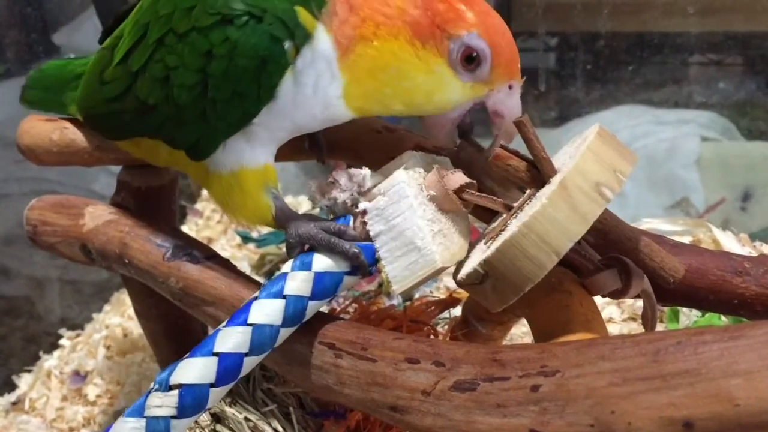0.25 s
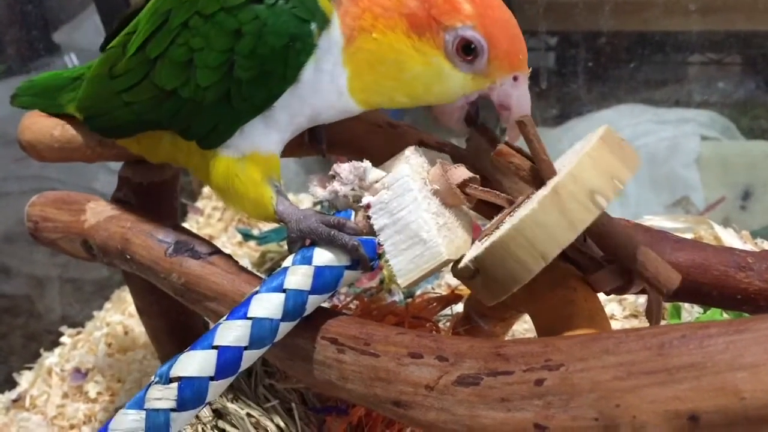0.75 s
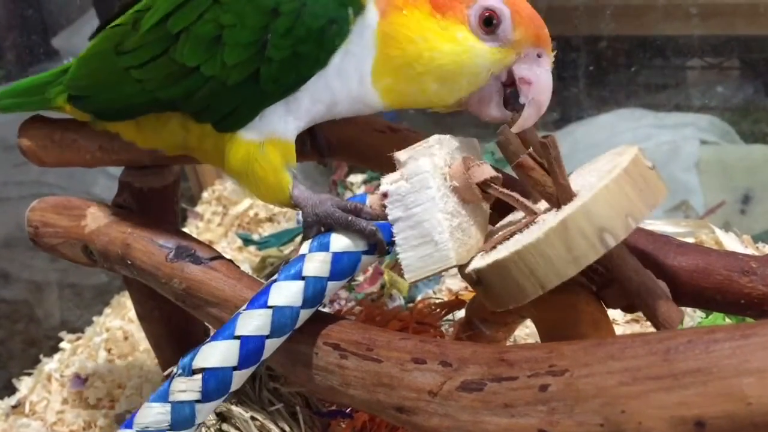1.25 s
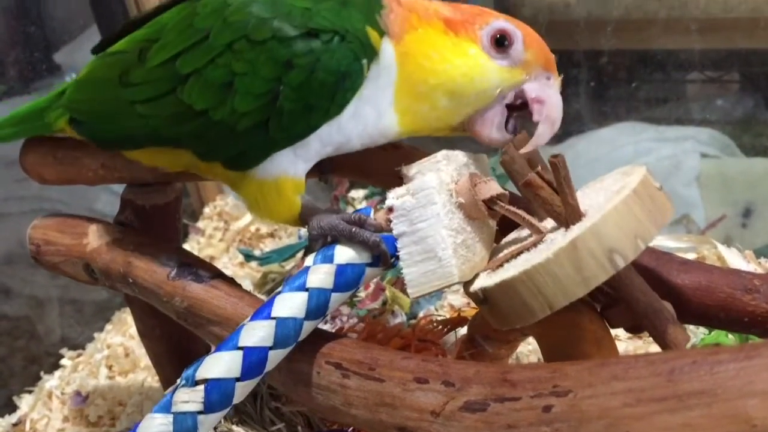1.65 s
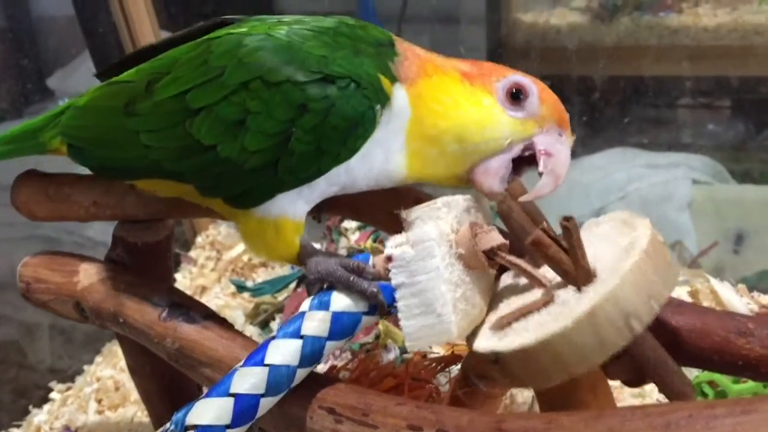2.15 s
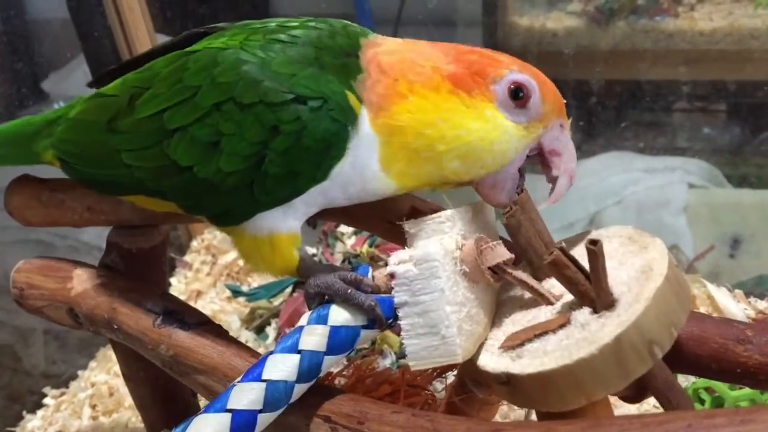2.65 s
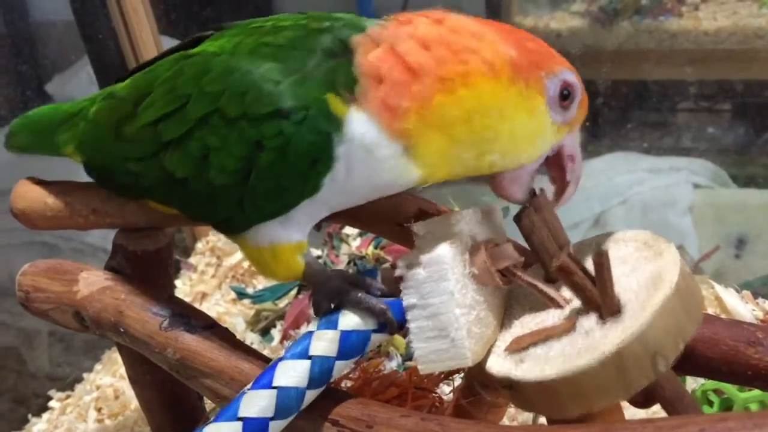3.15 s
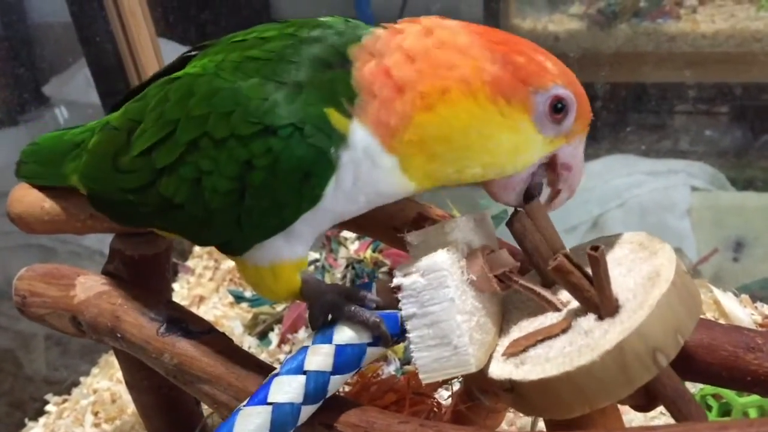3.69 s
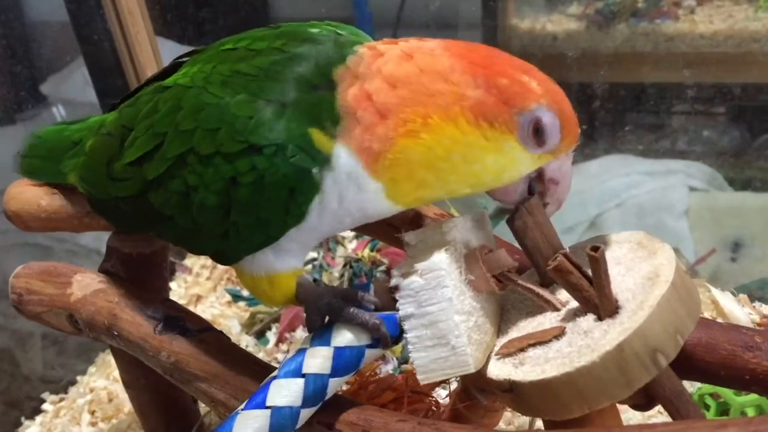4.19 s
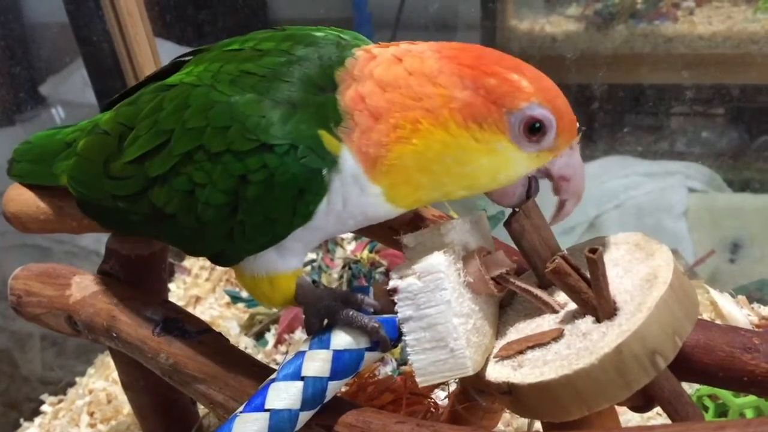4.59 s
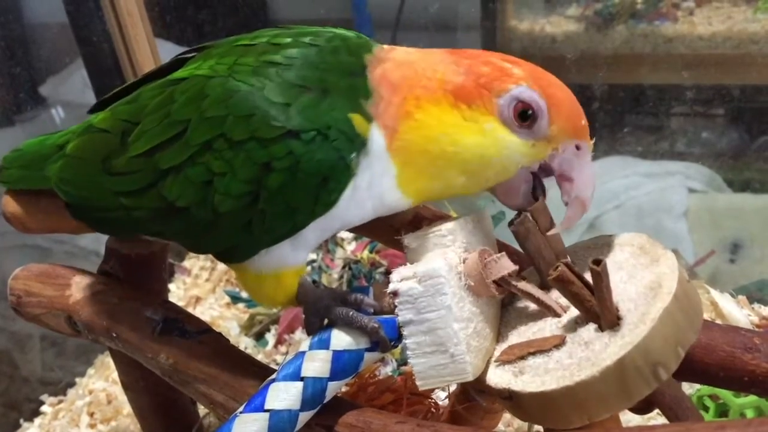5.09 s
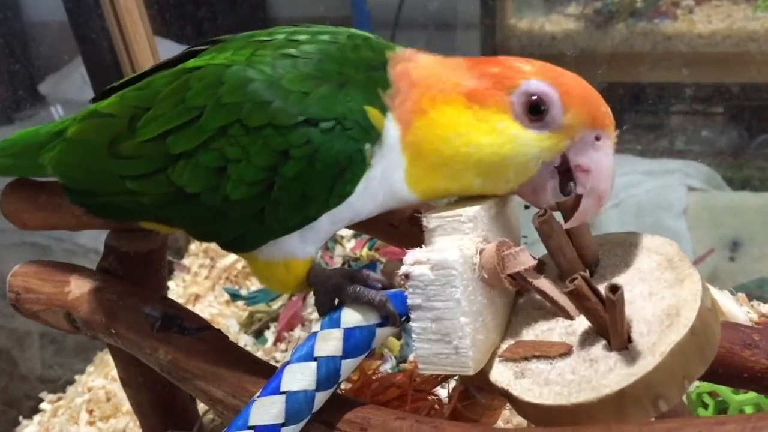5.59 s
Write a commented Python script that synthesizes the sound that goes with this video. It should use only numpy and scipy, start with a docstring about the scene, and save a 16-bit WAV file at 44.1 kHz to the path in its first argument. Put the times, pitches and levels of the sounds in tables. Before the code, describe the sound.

Dry, brittle gnawing recorded close indoors with a short room tail. A beak scrapes and nips woody sticks; fibres tick and snap, loose bits rustle, and each tug gives the perch a deep short wobble and dull thud. Activity is light at first, thins near two seconds, builds to hard cracks around three to four and a quarter, nearly pauses, then resumes with lighter bites. Faint air hiss and low hum stay behind.

```python
"""Parrot gnawing a wooden toy

A parrot gnaws bark sticks close by in a small quiet room. Fibres snap in flurries, each a burst of
tiny breaks ringing the wood; the beak rasps by stick and slip, and soft hollow tones sound along.
Each tug jolts the perch into a low wobble, thuds rattle its frame and loose fibres rustle.
Shaped noise and a low sine make the faint hiss and hum behind."""
import sys
import numpy as np
from scipy import signal
from scipy.fft import rfft, irfft
from scipy.io import wavfile
from scipy.ndimage import uniform_filter1d

SR = 44100
rng = np.random.default_rng(int(sys.argv[2]) if len(sys.argv) > 2 else 0)


def inscribe(sig):
    """Save sig as 16-bit PCM at rate SR to the path in sys.argv[1].

    A 1-D sig is mono; a 2-D sig holds one channel per row.
    Samples are clipped to [-1, 1] before scaling.
    """
    pcm = np.round(np.clip(np.atleast_2d(sig).T, -1, 1) * 32767)
    wavfile.write(sys.argv[1], SR, pcm.astype(np.int16))


N = 257103
TIME = np.arange(N) / SR
DRAW = SR // 6   # samples given to one contact

# How hard the bird works, steering the trembling perch: (time [s], effort level [dB])
EFFORT = [(0.0, -76), (0.57, -68.5), (0.78, -71), (1.39, -65), (2.0, -72), (2.18, -63), (2.35, -56),
          (2.78, -64), (3.41, -51.5), (3.59, -65), (3.85, -59.5), (4.14, -59), (4.38, -64), (4.74, -76),
          (5.03, -68), (5.23, -56.5), (5.52, -57), (5.83, -61.5)]
# Strokes of the beak over bark, knock and edge set against the rasp:
# (time [s], length [s], rasp level [dB], knock [dB], edge [dB], stick pitch [Hz])
BEAK_STROKES = [(0.046, 0.028, -64, 3, -14, 1718), (0.099, 0.033, -79.5, 10.5, 5.5, 1144),
                (0.161, 0.017, -60.5, -14.5, -11.5, 2579), (0.199, 0.047, -69, -8.5, -4, 2993),
                (0.268, 0.027, -83, 8.5, -9, 825), (0.32, 0.055, -78.5, 2, -19, 1765),
                (0.605, 0.035, -84, 7.5, -7, 1736), (0.641, 0.048, -66, 2, -10.5, 1427),
                (0.694, 0.028, -70.5, -2, -10.5, 1734), (0.748, 0.04, -60.5, 0, -10.5, 1402),
                (0.857, 0.044, -75.5, 0.5, -5.5, 3320), (0.941, 0.02, -72, 7, -7.5, 1669),
                (0.998, 0.041, -64, -1, -13, 1817), (1.045, 0.052, -65.5, -5, -10, 2015),
                (1.119, 0.036, -69.5, -12, -1, 3350), (1.159, 0.05, -67.5, -11, 2, 1048),
                (1.22, 0.039, -68, 2, -4.5, 767), (1.254, 0.043, -59.5, 2, -9.5, 2940),
                (1.388, 0.015, -71, -7, -0.5, 1838), (1.422, 0.016, -84.5, 13.5, -4.5, 1105),
                (1.484, 0.038, -72.5, 0, -5, 1166), (1.521, 0.035, -70.5, 0, -1, 857),
                (1.563, 0.042, -72, -1.5, -13, 1785), (1.636, 0.013, -75.5, 2.5, -11, 2240),
                (1.891, 0.049, -66, -3, -14.5, 1727), (2.057, 0.026, -76, 3.5, -8, 1170),
                (2.264, 0.02, -73.5, 16.5, 0.5, 951), (2.29, 0.042, -66, 9, -1.5, 1145),
                (2.356, 0.024, -77, 7, 0.5, 1073), (2.391, 0.056, -71.5, 2.5, -10, 1110),
                (2.474, 0.029, -64.5, -5, -5, 3050), (2.526, 0.024, -69, 2, -11, 1189),
                (2.622, 0.09, -73.5, -0.5, -4, 3068), (2.765, 0.034, -65, 2.5, -6, 2050),
                (2.853, 0.022, -62, 3, -16, 1510), (2.952, 0.06, -63, -6, -11.5, 1682),
                (3.071, 0.049, -78.5, 11.5, -0.5, 1675), (3.218, 0.042, -65, -3.5, -3, 2301),
                (3.263, 0.055, -69.5, 6.5, -1, 1079), (3.387, 0.027, -63.5, 9.5, -17, 1310),
                (3.443, 0.0325, -63, 5, -7, 1086), (3.485, 0.03, -58, 0.5, -15.5, 1520),
                (3.533, 0.014, -65, 1, -14.5, 1750), (3.676, 0.017, -74.5, 10.5, -8.5, 1080),
                (3.748, 0.031, -67, 0.5, -5.5, 1160), (3.84, 0.026, -68.5, -9, -24.5, 2120),
                (4.577, 0.016, -76.5, 5.5, -11, 1722), (4.712, 0.053, -69.5, 4, -6, 1702),
                (5.005, 0.024, -74, 6.5, -9, 1105), (5.059, 0.04, -80, 8.5, -2.5, 986),
                (5.135, 0.019, -81.5, 16, -11, 1144), (5.198, 0.024, -72.5, 6, -20, 2326),
                (5.302, 0.07, -71.5, -0.5, -7, 1767), (5.549, 0.012, -66.5, -2, -16.5, 1644),
                (5.591, 0.021, -70, 11, -9.5, 1501), (5.656, 0.059, -66.5, -6, -3.5, 2996),
                (5.775, 0.045, -72.5, -6, -8, 2300)]
# Clear snaps of fibres, knock, body and edge set against the snap:
# (time [s], snap level [dB], knock [dB], body [dB], edge [dB], stick pitch [Hz])
FIBRE_SNAPS = [(0.0468, -66, 13.5, 16, -3, 1757), (0.1595, -61, -18, 2, -9, 2600),
               (0.2175, -62.5, -14, 2.5, -12, 3120), (0.239, -64.5, -14.5, 8.5, 4, 2610),
               (0.645, -57.5, -24, 0.5, -10.5, 1715), (0.669, -64.5, 7.5, 6, 6, 1418),
               (0.756, -48.5, -9.5, 1, -13.5, 1270), (0.7704, -45, -12, -19.5, -5.5, 1087),
               (0.946, -59.5, 4.5, -2.5, -6, 1110), (1.0038, -61, 4.5, -12.5, -4.5, 1180),
               (1.1517, -30.5, -18, -11.5, -10, 2260), (1.1782, -61, -17, 4, 8, 2580),
               (1.202, -64, 13.5, 2, -10, 1100), (1.2713, -39.5, -24, -0.5, -5, 3020),
               (1.2876, -62.5, 5.5, 12.5, 1.5, 2902), (1.4916, -64.5, 6.5, 4.5, 6, 1178),
               (1.5687, -58, -15, -8.5, -8, 2250), (1.5854, -54, -16.5, -8, -10.5, 1772),
               (2.163, -68, -10, -10, -10, 2296), (2.2717, -71, 19.5, -4.5, -10, 921),
               (2.3028, -55, -7, 6.5, -13, 917), (2.318, -50, 5, 4.5, -11, 1162),
               (2.3668, -62, -2.5, -3, 6.5, 1090), (2.4452, -63.5, -24, 5, 12.5, 2980),
               (2.49, -57.5, -1, 4.5, -2, 3120), (2.838, -60, -4, -0.5, -8, 1120),
               (2.8524, -36.5, -30, 2.5, -9.5, 2600), (2.9697, -46, -13.5, -3.5, -18.5, 1693),
               (2.9866, -49, -3, -3.5, -13.5, 2230), (3.0236, -66, -14, -9.5, -2, 2280),
               (3.096, -76, 19.5, 10.5, 4.5, 1455), (3.114, -77.5, 4, 2.5, 17.5, 1100),
               (3.2486, -63.5, -33, -5.5, 11.5, 3180), (3.3005, -58.5, 4, -9, -6, 1111),
               (3.3715, -31.5, -1, -9, -21, 1110), (3.3747, -47, 5, 9, -16, 1125),
               (3.4004, -58.5, -3, 8.5, -9, 1130), (3.456, -54.5, 11.5, -1, -6, 1160),
               (3.4795, -42, 1.5, 5.5, -7, 1026), (3.485, -36, -3, -22, -12, 2270),
               (3.4908, -39, -1, 0.5, -18, 2140), (3.551, -36, -9, 1.5, -3.5, 2230),
               (3.6064, -65, -2.5, 0.5, -6.5, 1800), (3.703, -44.5, -7.5, -6, -15, 1115),
               (3.7452, -60.5, 7, 2, -7.5, 1150), (3.8076, -54.5, -6.5, -7, -14, 1440),
               (3.8446, -51, -15, -14, -21.5, 776), (3.9279, -41.5, -20, -15.5, -22.5, 1760),
               (3.965, -31, -22.5, -19, -15.5, 3490), (4.0527, -23.5, -19.5, -6, -6, 2200),
               (4.202, -64, -4.5, -14, -1.5, 1120), (4.214, -66.5, -7, -2, -2, 2280),
               (4.2354, -13.5, -21.5, -10.5, -6, 3004), (4.381, -60, -17, -3, -27, 2264),
               (4.749, -51, -8, -7.5, -19, 1199), (5.31, -59.5, -6.5, 6.5, -4.5, 2953),
               (5.4284, -46, -12.5, 1.5, -8.5, 820), (5.599, -68.5, 9.5, 17, -8, 1470),
               (5.6694, -56, -11, 0.5, -10.5, 2973), (5.712, -72, -9, -4, 5.5, 3260)]
# Tugs and steps that jolt the perch: (time [s], level before trim [dB], middle pitch [Hz])
JOLTS = [(0.173, -46, 93), (0.275, -50, 110), (0.314, -41, 86.5), (0.37, -53, 95), (0.549, -49.5, 107),
         (0.643, -51, 108), (0.719, -55, 90), (0.775, -49.5, 87), (0.827, -45, 103.5), (0.95, -55, 94),
         (1.006, -40, 105), (1.078, -46.5, 111.6), (1.209, -45.5, 79.6), (1.298, -40, 78),
         (1.344, -43.5, 69.6), (1.405, -47.5, 95), (1.499, -48, 103.5), (1.555, -53, 90), (1.643, -50, 93),
         (1.804, -51, 91), (1.855, -50, 94), (1.914, -51.5, 91), (2.064, -59, 100), (2.142, -54, 103),
         (2.179, -54, 101), (2.299, -45.5, 96.4), (2.375, -51, 91), (2.496, -42.5, 103.6),
         (2.681, -49.5, 74), (2.85, -52.5, 90.7), (2.89, -45, 102), (2.998, -49, 68.6),
         (3.235, -45.5, 95.4), (3.383, -37.5, 83.6), (3.465, -41.5, 87), (3.56, -39, 88), (3.745, -44, 104),
         (3.789, -47.5, 81), (3.86, -47.5, 86.4), (3.939, -38.5, 95.7), (4.062, -32, 97.6),
         (4.124, -43, 98), (4.186, -39, 90.7), (4.247, -40, 90), (4.6, -52.5, 90), (4.762, -47.5, 103.7),
         (5.02, -50, 85.6), (5.073, -48, 103), (5.441, -42, 107.4), (5.5, -50.5, 65), (5.585, -46.5, 70.7),
         (5.66, -51, 76)]
# Soft hollow tones, mostly heard along with the bites:
# (time [s], length [s], pitch [Hz], level before trim [dB])
HOLLOW_TONES = [(0.215, 0.061, 634, -75), (0.653, 0.037, 620, -66), (0.693, 0.048, 602, -64.5),
                (1.051, 0.043, 590, -71), (1.224, 0.031, 763, -56.5), (2.388, 0.046, 616, -69.5),
                (4.366, 0.088, 554, -64.5), (4.445, 0.048, 540, -71.5), (4.985, 0.1, 490, -70),
                (5.426, 0.025, 800, -54), (5.437, 0.062, 663, -61), (5.449, 0.068, 541, -66.5)]
# Dull thuds of feet and toy against the frame: (time [s], level before trim [dB], pitch [Hz])
THUDS = [(0.281, -56, 294), (0.551, -56, 256), (0.658, -52, 298), (0.709, -57, 303), (0.761, -48, 328),
         (0.959, -52, 290), (1.018, -48, 318), (1.085, -51.5, 288), (1.267, -42, 285), (1.642, -57.5, 304),
         (1.875, -58, 250), (2.272, -53, 211), (2.33, -54, 210), (2.501, -47, 185), (2.628, -52, 380),
         (2.689, -57.5, 291), (2.994, -48.5, 171), (3.304, -51, 172), (3.376, -46, 303), (3.419, -75, 174),
         (3.46, -40, 310), (3.486, -41.5, 298), (3.553, -47.5, 296), (3.704, -46, 336), (3.758, -51, 224),
         (3.848, -55.5, 351), (3.969, -48.5, 324), (4.055, -46.5, 342), (4.608, -58, 192),
         (4.752, -50.5, 173), (5.005, -53.5, 194.6), (5.081, -53, 194), (5.319, -58.5, 173),
         (5.432, -43.5, 172), (5.554, -50.5, 360), (5.6, -49.5, 174.5), (5.659, -51.5, 366)]
# Resonances of stick, disc and beak: (frequency [Hz], width [Hz], relative level [dB])
WOOD_MODES = [(1190, 61, 0.5), (1436, 110, 0.5), (1737, 25, 0), (2264, 56, 8.5), (2473, 38, 0),
              (3025, 120, 3.5), (3195, 37, 5.5), (4790, 680, -6), (5165, 25, 0), (5680, 150, 4.5),
              (6000, 87, -8.5), (6620, 110, 2.5), (8800, 75, -13.5), (8265, 58, 2.5), (9180, 54, -1),
              (11770, 140, -6.5)]
# Resonances of the perch frame: (frequency [Hz], width [Hz], relative level [dB])
FRAME_MODES = [(180, 23, -6.5), (241.6, 15, -2), (291, 21, 0.5), (354, 12, -1.5), (492, 330, -13)]
# Slow swings of the whole perch: (frequency [Hz], width [Hz], relative level [dB])
SWAY_MODES = [(62, 5.4, 0), (90.7, 5, 5.5), (115, 18, -5), (161, 23, -18)]
# Colour of rustling fibres: (frequency [Hz], relative level [dB])
RUSTLE_SPECTRUM = [(400, -18.5), (700, -10), (1200, 10), (2200, 6), (4000, 3.5), (6200, -2.5), (10000, -8),
                   (16000, -13.5)]
# Colour of the room air: (frequency [Hz], relative level [dB])
AIR_SPECTRUM = [(25, -39.5), (39, -27.5), (62, -15), (90, -14), (125, -6.5), (165, -18), (250, -25.5),
                (500, -19.5), (1200, -25.5), (2000, -26), (4000, -28.5), (6000, -29.5), (8500, -32.5),
                (16000, -36.5)]
# Borders of the four bands knock, body, snap and edge: (frequency [Hz])
ZONE_EDGES_HZ = [700, 1500, 3600, 8000, 14800]
# Time for the room tail to fall 60 dB, for each of the four bands: (time [s])
ROOM_T60_S = [.34, 0.1, 0.27, .28]
# Strength of the room tail in the same four bands: (level [dB])
ROOM_DB = [-24, -21, -24, -25]

ZONES = [signal.butter(3, pair, "band", fs=SR, output="sos")
         for pair in zip(ZONE_EDGES_HZ, ZONE_EDGES_HZ[1:])]
FIRM_BITE_DB = -54.5   # level of a bite that presses with unit force
FULL_EFFORT_DB = -52   # the bird working flat out
CUTOFF_HZ = 16200


def from_db(db):
    """Decibels to amplitude."""
    return 10 ** (np.asarray(db) / 20)


def rms(x):
    """Effective level, kept just above zero."""
    return np.sqrt(np.mean(x ** 2) + 1e-24)


def add(out, s, sound):
    """Mix a sound in at a time."""
    at = max(0, round(s * SR))
    out[at:at + len(sound)] += sound[:max(0, N - at)]


def butter(x, hz, kind, order=2):
    """Smooth low, high or band filter."""
    return signal.sosfilt(signal.butter(order, hz, kind, fs=SR, output="sos"), x)


def resonate(x, modes):
    """Parallel resonances; a narrower one rings longer."""
    out = 0
    for hz, width, db in modes:
        r = np.exp(-np.pi * width / SR)
        poles = [1, -2 * r * np.cos(2 * np.pi * hz / SR), r * r]
        ringing = signal.lfilter([1, 0, -1], poles, x + 1e-18)
        out = out + from_db(db) * (1 - r * r) / 2 * ringing
    return out


def shaped(x, spectrum):
    """Give a steady texture a spectrum; rms 1."""
    hz, db = np.transpose(spectrum)
    bins = np.maximum(np.fft.rfftfreq(N, 1 / SR), 1)
    gain = from_db(np.interp(np.log(bins), np.log(hz), db)) * (bins > 20)
    y = irfft(rfft(x) * gain, N)
    return y / rms(y)


def evened(x, span_s):
    """Take out the slow swells of a texture; rms near 1."""
    power = uniform_filter1d(x ** 2, round(span_s * SR))
    return x / np.sqrt(power + 0.017 * rms(x) ** 2)


def grains(n, per_s, spread_db):
    """Tiny fractures at random moments, of very uneven size; rms 1."""
    sizes = from_db(spread_db * np.minimum(rng.exponential(1, n), 4)) * rng.standard_normal(n)
    clicks = sizes * (rng.random(n) < per_s / SR)
    return clicks / rms(clicks)


def swells(rows, rise_s, fade_s):
    """A gain in time: each event rises and dies away, and overlaps sum in power."""
    power, t = np.zeros(N), TIME[:SR]
    shape = np.clip(t / rise_s, 0, 1) * np.exp(-np.maximum(t - rise_s, 0) / fade_s)
    for s, db, *_ in rows:
        add(power, s, (from_db(db) * shape) ** 2)
    return np.sqrt(power)


def background(air_db=-76, hum_hz=60, hum_db=-75):
    """Room air as shaped noise, with a faint low hum."""
    air = from_db(air_db) * shaped(rng.standard_normal(N), AIR_SPECTRUM)
    return air + from_db(hum_db) * np.sin(2 * np.pi * hum_hz * TIME)


def trembling(effort_db, sway_db=-3, after_db=-19, deep_db=-17):
    """The perch trembles under the working bird and sways on after each jolt, with a deep rumble below."""
    swing = resonate(rng.standard_normal(N), SWAY_MODES)
    tremble = evened(butter(butter(swing, 50, "high", order=3), 160, "low"), .07)
    rumble = evened(butter(rng.standard_normal(N), [38, 58], "band", order=3), .2)
    after_sway = from_db(after_db) * swells(JOLTS, rise_s=0.055, fade_s=0.045)
    return (tremble + from_db(deep_db) * rumble) * (from_db(effort_db + sway_db) + after_sway)


def shuffling(effort_db, shuffle_db=-16, thud_db=-11):
    """The frame rattles dully: a little as the bird shifts, more with each thud."""
    rattle = resonate(grains(N, 1500, 2.2), FRAME_MODES)
    rattle = evened(butter(rattle, 590, "low"), 0.034)
    thud_swell = from_db(thud_db) * swells(THUDS, rise_s=0.011, fade_s=0.02066)
    return rattle * np.hypot(from_db(effort_db + shuffle_db), thud_swell)


def pressing(beak, relax_hz=12, hardest=1.3):
    """How hard the beak presses: it jumps with each bite, up to a limit, and then relaxes."""
    force = uniform_filter1d(beak ** 2, SR // 200) / from_db(FIRM_BITE_DB) ** 2
    force = np.minimum(force, hardest ** 2)
    return np.sqrt(np.maximum(butter(force + 1e-18, relax_hz, "low", order=1), 1e-18))


def rustling(effort_db, press, rustle_db=-74, with_effort=0.54, crumble_db=-69, with_press=0.94):
    """Loose fibres rustle as the bird works, and crumble after each bite."""
    fibres = shaped(grains(N, 2200, 2.6), RUSTLE_SPECTRUM)
    working = from_db(rustle_db + with_effort * (effort_db - FULL_EFFORT_DB))
    crumbling = from_db(crumble_db) * np.minimum(press, 2) ** with_press
    return fibres * np.hypot(working, crumbling)


def room(x, build_s=0.0044):
    """Each band of the near sound feeds the room, where it dies away as a diffuse, faintly woody wash."""
    out, t = 0, TIME[:SR // 2]
    noise = rng.standard_normal(N)
    noise = butter(noise + resonate(noise, WOOD_MODES), 9000, "low", order=1)
    for zone, t60, db in zip(ZONES, ROOM_T60_S, ROOM_DB):
        # silent for one build-up time, then fading in over another
        decay = from_db(-60 * t / t60) ** 2 * np.clip(t / build_s - 1, 0, 1)
        fed = signal.sosfilt(zone, x + 1e-18) ** 2
        energy = signal.fftconvolve(fed, decay / decay.sum())[:N]
        wash = signal.sosfilt(zone, noise)
        out = out + from_db(db) * np.sqrt(np.maximum(energy, 0)) * wash / rms(wash)
    return out


def coloured(x, span_s, snap_db, knock_db, body_db, edge_db):
    """Set the strength of knock, body, snap and edge over the first span of a contact."""
    out = 0
    for k, (zone, db) in enumerate(zip(ZONES, [knock_db, body_db, 0, edge_db])):
        part = signal.sosfilt(zone, x + 1e-18)
        level = from_db(snap_db + db) / rms(part[:round(span_s * SR)])
        out = out + (-1) ** k * part * level   # neighbouring bands in opposite polarity
    return out


def splinter(force, count=5):
    """Every loosened splinter rings with a few resonances of its own."""
    pitches = np.geomspace(1500, 9000, count) * 2 ** rng.uniform(-.3, .3, count)
    return resonate(force, [(hz, 70 + hz / 30, 0) for hz in pitches])


def toy(force, stick_hz, stick_width_hz=90, stick_db=11, ring_db=9, splinter_db=6,
        echo_s=0.001126, echo_db=-8, scatter_db=-5, scatter_t60=0.061):
    """A contact is heard directly, off the wooden disc, as ringing wood and scattered by the branches."""
    t = TIME[:DRAW]
    direct = force + from_db(echo_db) * np.interp(t - echo_s, t, force, left=0)
    # the grip sets the free length of the stick, so each bite has a pitch of its own
    stick = resonate(direct, [(stick_hz, stick_width_hz, stick_db)])
    wood = from_db(ring_db) * resonate(direct, WOOD_MODES)
    splinters = from_db(splinter_db) * splinter(direct)
    scatter = rng.standard_normal(DRAW) * from_db(-60 * t / scatter_t60) * (t > echo_s)
    scatter *= from_db(scatter_db) / np.linalg.norm(scatter)
    return direct + stick + wood + splinters + signal.fftconvolve(direct, scatter)[:DRAW]


def scrapes(slips_per_s=900, spread_db=2.5, friction=0.84, ease=0.4, bite_s=0.0041, release_s=0.0045,
            jerk_db=3.0, jerk_s=0.0054, body_db=1.2, body_follows=0.38):
    """The beak sticks and slips over bark in jerks, easing off; a hollower stroke has more body too."""
    out, t = np.zeros(N), TIME[:DRAW]
    for s, length, rasp_db, knock_db, edge_db, stick_hz in BEAK_STROKES:
        pressure = np.clip(t / bite_s, 0, 1) * np.clip((length - t) / release_s, 0, 1)
        pressure = pressure * (1 - ease * t / length)
        jerks = np.interp(t / jerk_s, np.arange(DRAW), rng.standard_normal(DRAW))
        texture = grains(DRAW, slips_per_s, spread_db) + friction * rng.standard_normal(DRAW)
        force = pressure * from_db(jerk_db * jerks) * texture
        rasp = toy(force, stick_hz, stick_width_hz=130, stick_db=23.0, splinter_db=17)
        stroke_body_db = body_db + body_follows * knock_db
        add(out, s, coloured(rasp, length, rasp_db, knock_db, stroke_body_db, edge_db))
    return out


def fracture(run_s):
    """A run of tiny breaks swells and dies, its energy spread more evenly over all frequencies."""
    age = np.minimum(TIME[:DRAW] / run_s, 6)
    burst = rfft(rng.standard_normal(DRAW) * np.sqrt(age) * np.exp(-age ** 2))
    even = irfft(burst / np.sqrt(np.abs(burst) + 1e-9), DRAW)
    return even * (age < 6)


def cracks(tear_s=.0024, tear_growth=0.24, shortest_s=0.00096):
    """Fibres snap under the beak; the bigger a snap is, the longer its tear runs."""
    out = np.zeros(N)
    strongest = max(row[1] for row in FIBRE_SNAPS)
    for s, snap_db, *colour, stick_hz in FIBRE_SNAPS:
        run_s = max(shortest_s, tear_s * from_db(tear_growth * (snap_db - strongest)))
        add(out, s, coloured(toy(fracture(run_s), stick_hz), .0045, snap_db, *colour))
    return out


def frame_knock(beak, level_db=-11, fade_hz=26):
    """The dull part of each bite also shakes the frame of the perch."""
    dull = butter(beak + 1e-12, 1600, "low", order=4)
    push = np.sqrt(np.maximum(butter(dull ** 2, fade_hz, "low", order=1), 0))
    return from_db(level_db) * push * evened(resonate(rng.standard_normal(N), FRAME_MODES), 0.019)


def ticks(press, count=55, tick_db=-71, follows=0.59, spread_db=1.5,
          knock_db=-3, body_db=0, edge_db=-2, run_s=0.00078):
    """Small splinters give way at random, oftener and louder the harder the beak presses."""
    out, chance = np.zeros(N), np.minimum(press, 1)
    turns = (np.arange(count) + rng.random(count)) / count
    moments = np.interp(turns, np.cumsum(chance) / chance.sum(), TIME)
    variations = spread_db * rng.standard_normal((count, 3))
    pitches = rng.uniform(1100, 2900, count)
    for s, (size, knock, edge), stick_hz in zip(moments, variations, pitches):
        tick = coloured(toy(fracture(run_s), stick_hz), .0045,
                        tick_db + size, knock_db + knock, body_db, edge_db + edge)
        add(out, s, np.interp(s, TIME, chance) ** follows * tick)
    return out


def jolts(rise_s=0.0094, sag=0.09, level_db=-1, ring_db=-14, ring_s=0.059):
    """A tug swings the perch hard for a few cycles; the swing slows and rings on softly."""
    out, t = np.zeros(N), TIME[:SR // 3]
    push = (t / rise_s) ** 2 * np.exp(2 - 2 * t / rise_s)
    ring = from_db(ring_db) * np.minimum(t / rise_s, 1) * np.exp(-t / ring_s)
    for s, db, hz in JOLTS:
        pitch = hz * (1 + sag * (2 * np.exp(-t / (2 * rise_s)) - 1))
        swing = np.sin(2 * np.pi * np.cumsum(pitch) / SR)
        add(out, s, from_db(db + level_db) * np.hypot(push, ring) * swing)
    return out


def hollow_tones(width_hz=75, peak_share=0.28, level_db=-1):
    """Short, soft notes of noise in one hollow resonance; each swells quickly and fades."""
    out, t = np.zeros(N), TIME[:DRAW]
    for s, length, hz, db in HOLLOW_TONES:
        mode, age = [(hz, width_hz, 0)], t / (peak_share * length)
        noise = resonate(resonate(rng.standard_normal(2 * DRAW), mode), mode)
        noise = evened(noise, 0.028)[DRAW:]   # skip the resonance building up
        tone = noise * age * np.exp(-age)
        add(out, s, from_db(db + level_db) * tone / rms(tone[:round(length * SR)]))
    return out


def thuds(rise_s=0.0071, level_db=-8):
    """Each thud sets the frame ringing briefly at a low note."""
    out, t = np.zeros(N), TIME[:DRAW]
    swell = t / rise_s * np.exp(1 - t / rise_s)
    for s, db, hz in THUDS:
        add(out, s, from_db(db + level_db) * swell * np.sin(2 * np.pi * hz * t))
    return out


def scene():
    """Beak, perch and loose fibres, with their room and the air behind."""
    effort_db = np.interp(TIME, *np.transpose(EFFORT))
    beak = cracks() + scrapes()
    press = pressing(beak)
    perch = trembling(effort_db) + shuffling(effort_db) + frame_knock(beak) + jolts() + thuds()
    near = beak + ticks(press) + rustling(effort_db, press) + hollow_tones() + butter(perch, 26, "high")
    return (near + room(near) + background())[None]


def record(dry):
    """The microphone rounds off the loudest peaks; the top is cut steeply."""
    rounded = .6 * np.tanh(dry / .6)
    return signal.sosfilt(signal.ellip(10, .1, 80, CUTOFF_HZ, fs=SR, output="sos"), rounded)


dry = scene()
out = record(dry)
inscribe(out)
```